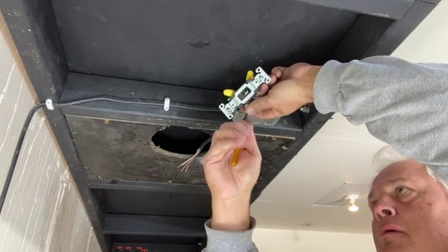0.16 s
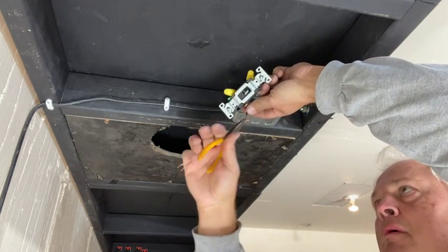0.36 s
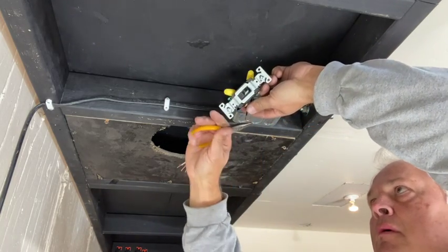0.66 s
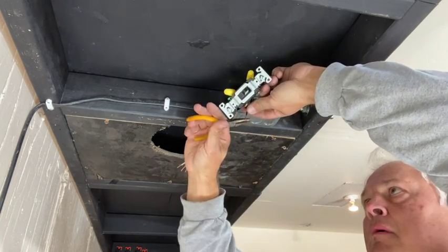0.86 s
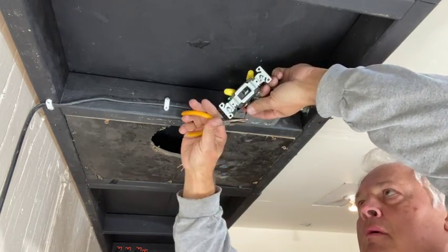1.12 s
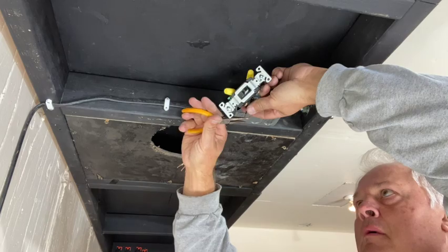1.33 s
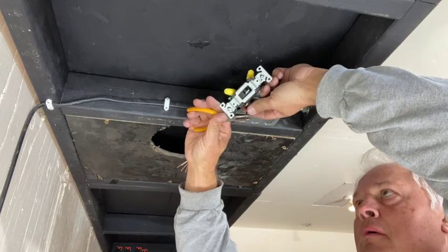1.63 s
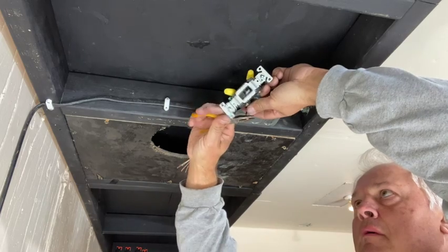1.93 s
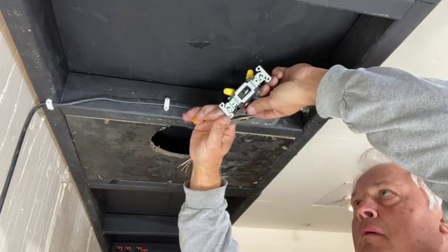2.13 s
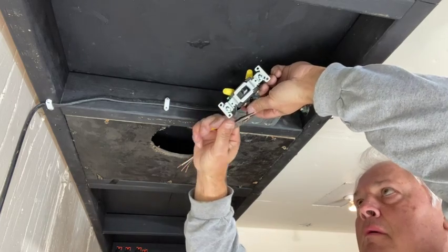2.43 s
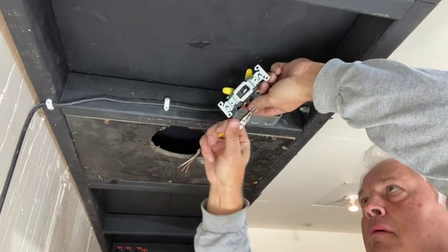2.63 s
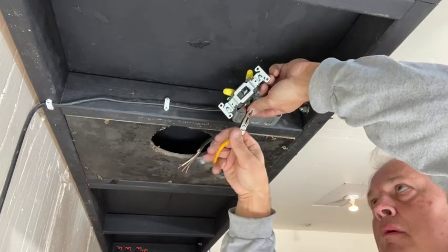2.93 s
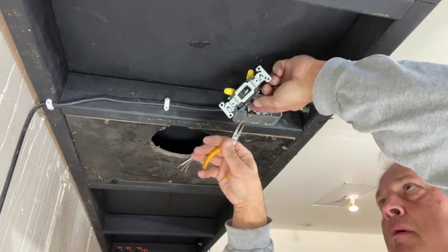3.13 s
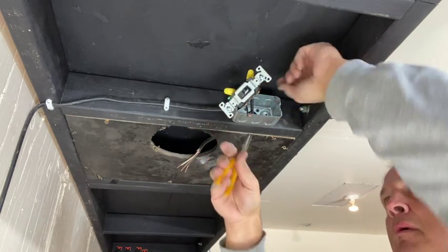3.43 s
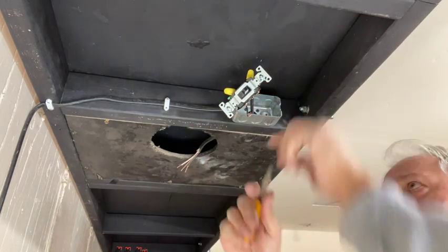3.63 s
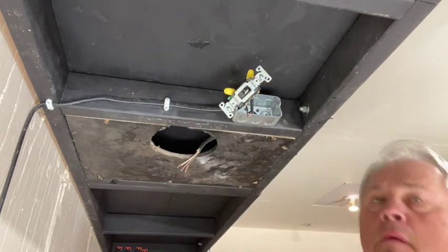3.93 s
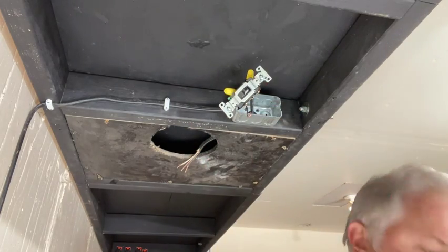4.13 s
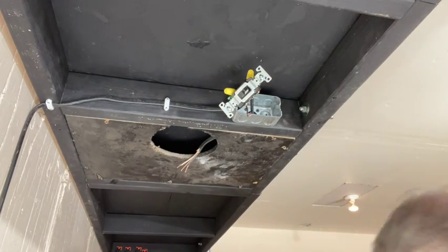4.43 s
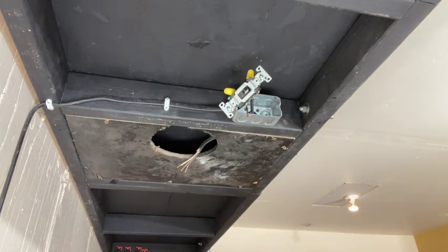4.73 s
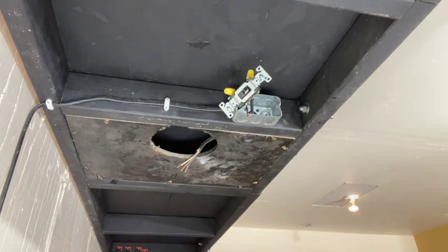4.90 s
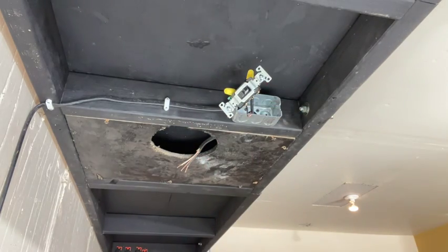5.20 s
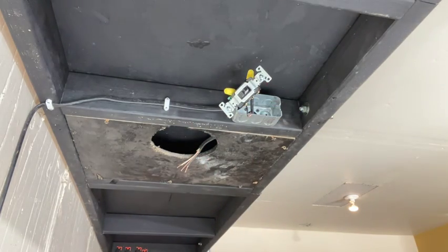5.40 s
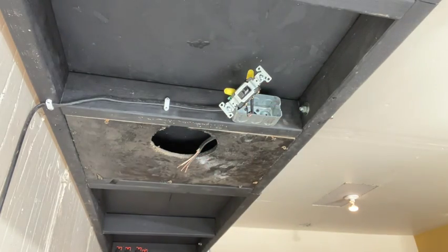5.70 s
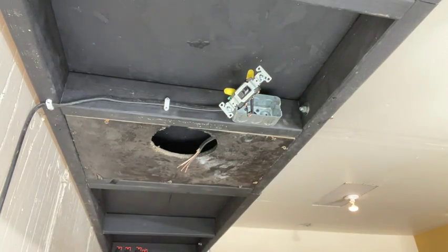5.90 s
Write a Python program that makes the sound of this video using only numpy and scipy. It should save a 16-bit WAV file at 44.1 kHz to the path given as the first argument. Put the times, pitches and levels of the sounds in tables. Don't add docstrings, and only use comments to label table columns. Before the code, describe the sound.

In a quiet bare room, irregular small steel snaps and wire scratches come with box knocks and low woody bumps, strongest around two and three seconds. Cloth rustles, soles scuff on rungs, tools clink lightly. Near five seconds a far louder burst of hollow bangs and metal clatter erupts, ending in soft knocks, rustling and faint room tone.

```python
import sys
import numpy as np
from scipy import signal
from scipy.fft import rfft, irfft, next_fast_len
from scipy.io import wavfile

SR = 44100
rng = np.random.default_rng(int(sys.argv[2]) if len(sys.argv) > 2 else 0)


def gain_from_db(level_db):
    decades = np.asarray(level_db, float) / 20
    return 10 ** decades


def unload_audio(sound):
    columns = np.transpose(np.atleast_2d(sound))
    steps = np.round(np.clip(columns, -1, 1) * 32767)
    wavfile.write(sys.argv[1], SR, steps.astype(np.int16))


N = 266893

# pitch_hz, level_db, t60_s
TOOL_MODES = [(1870, -54, 0.065), (2562, -5, 0.091), (3300, 9, 0.035), (3916, 16.5, 0.018),
              (4320, -5, 0.06), (4306, 20, 0.0086), (5170, 13, 0.02), (8370, 21, 0.0093), (8900, 6, 0.0069),
              (10850, 0, 0.015)]
# pitch_hz, level_db, t60_s
BOX_MODES = [(1112, 9.5, 0.12), (1227, 14, 0.15), (1365, 17, 0.026), (1510, 8.5, 0.11), (1926, -11.5, 0.1)]
# pitch_hz, level_db, t60_s
BASE_MODES = [(134.5, -4.5, 0.034), (192, -2, 0.037), (290, -6.5, 0.032), (344, -6, 0.091)]
# freq_hz, density_db_per_hz
CRACK_SPECTRUM = [(1760, -34), (3600, -5.5), (5220, -0.5), (7240, -11.5), (9760, -7.5), (11700, -21),
                  (12150, -23), (13400, -23), (13900, -23.5), (15800, -21.5), (16400, -55)]
NEAR_LAG, FAR_LAG = -4, 11


def terminals():
    return placed(ticks() + box_knocks() + rubbing(), NEAR_LAG, 0.075, wet_db=-7.5)


def ticks():
    # start_s, tool_ring_db, snap_above_ring_db
    contacts = [(0.14, -60, 0), (0.179, -58.5, -3), (0.248, -50, -27), (0.2612, -45, -26),
                (0.283, -46.5, 4), (0.304, -46, 6.5), (0.337, -40.5, -2), (0.352, -40.5, -5),
                (0.4864, -99, 32), (0.823, -51.5, -3.5), (0.93, -61, -25), (0.9922, -45.5, 0),
                (1.071, -58, 1), (1.343, -37, -7), (1.443, -67, -24), (1.592, -53, 6.5), (1.772, -50, -20),
                (1.906, -50.5, 6.5), (1.924, -47.5, 2.5), (1.9405, -37.5, -5), (1.999, -34, 4.5),
                (2.0188, -37.5, 2), (2.0575, -40, 6), (2.183, -78, -17), (2.414, -52.5, 0),
                (2.735, -68, 5.5), (2.813, -65, -22), (2.94, -35.5, 2.5), (3.0202, -29.5, 1.5),
                (3.0461, -50, -16)]
    # start_s, tool_ring_db, snap_above_ring_db
    jingles = [
        (3.834, -51.5, 1),
        (4.4945, -47.5, 0),
    ]
    # freq_hz, density_db_per_hz
    snap_spectrum = [(3240, -17), (5500, 6.5), (9920, 7.5), (11300, 1.5), (12300, 10), (13500, -11),
                     (15000, 4), (16000, -44), (16400, -66)]
    s, ring_db, snap_db = np.transpose(contacts + jingles)
    chatter_ms = np.full(len(s), 2.2)
    shank = varied(TOOL_MODES[:7], len(s), spread_db=0.0)

    def tool(force, k):
        rattle = band(band(force, 2830, 5040), 1700, 8800)
        return body(force, shank[k]) + 2.0 * rattle

    ring = hits(s, ring_db + 3.0, chatter_ms, tool, strike=0.84)
    snap = hits(s, ring_db + snap_db + 11.5, chatter_ms, lambda f, k: f, strike=4.8)
    return ring + coloured(snap, snap_spectrum)


def box_knocks():
    # start_s, level_db, spot_pitch_hz
    knocks = [(0.11, -63, 1520), (0.18, -57, 1330), (0.259, -49, 1360), (0.3033, -48, 1130),
              (0.3375, -67, 1115), (0.3517, -48.5, 1110), (0.823, -50.5, 1400), (0.927, -59, 1360),
              (0.994, -46, 1200), (1.0715, -50, 1100), (1.1855, -53.5, 1185), (1.3442, -35, 1330),
              (1.5944, -47.5, 1190), (1.7737, -59, 1340), (1.9418, -50, 1200), (2.0211, -64, 1630),
              (2.1808, -54, 900), (2.411, -54.5, 2000), (2.668, -63, 1050), (2.9415, -42, 970),
              (3.02, -28.5, 1340), (3.045, -35, 1170), (3.837, -53, 1070), (4.7745, -35.5, 1950),
              (2.984, -50, 2560)]
    s, level_db, spot_hz = np.transpose(knocks)

    def steel(force, k):
        spot = body(force, [(spot_hz[k], 0, 0.024)])
        return spot + 0.54 * body(force, BOX_MODES) + 0.11 * band(force, 940, 3100)

    return hits(s + 0.0014, level_db - 0.5, np.full(len(s), 5.0), steel, strike=1.4)


def rubbing():
    # freq_hz, density_db_per_hz
    scratch_spectrum = [(1060, -57), (1800, 9), (2530, 9.5), (3440, -41), (3950, -3.5), (6810, -17.5),
                        (10500, -7), (15400, -15), (16400, -40.5)]
    # start_s, end_s, pitch_hz, level_db,
    # t60_s
    drags = [(0.097, 0.135, 1490, -50, 0.03), (0.262, 0.29, 2520, -52, 0.03),
             (1.346, 1.42, 3800, -58, 0.01), (1.943, 1.965, 3700, -51, 0.02),
             (1.943, 1.965, 2700, -54, 0.02), (2.179, 2.21, 3650, -57, 0.02),
             (2.179, 2.205, 2650, -60, 0.02), (2.983, 3.068, 2530, -47, 0.035),
             (3.2, 3.25, 3250, -70, 0.03), (3.415, 3.47, 2050, -63, 0.008), (3.42, 3.5, 3500, -68, 0.01),
             (3.49, 3.58, 1620, -67, 0.02)]
    steeper = 2.1
    coarse, fine = grit(900, 4.5), grit(1400, 5.5)
    box = body(coarse, BOX_MODES) + 2.32 * band(coarse, 330, 3400)
    rub = gain_from_db(-3.5) * strokes(0.37, steeper) * box
    edge = coloured(fine + 4.6 * body(fine, TOOL_MODES), scratch_spectrum)
    scratch = gain_from_db(-13.5) * strokes(0.57, steeper) * edge
    t, squeal = np.arange(N) / SR, 0
    for start, end, hz, level_db, t60 in drags:
        grip = np.clip(np.minimum(t - start, end - t) / 0.0055, 0, 1)
        squeal = squeal + gain_from_db(level_db) * body(np.tanh(fine) * grip, [(hz, 0, t60)])
    return rub + scratch + squeal


def strokes(edge_share, steeper):
    # peak_s, panel_db, scratch_above_panel_db, rise_s, fall_s
    rubs = [(0.125, -56, -42, 0.082, 0.1), (0.268, -48.5, -7, 0.086, 0.28), (0.349, -41, -21.5, 0.23, 0.09),
            (0.834, -67, -19, 0.019, 0.062), (1.074, -51.5, -28.5, 0.37, 0.074),
            (1.2, -51, -70, 0.022, 0.083), (1.345, -49.5, -7.5, 0.027, 0.17), (1.6, -57, -47, 0.058, 0.33),
            (1.796, -48, -36, 0.31, 0.15), (1.7, -70, 0, 0.03, 0.039), (1.775, -70, -10, 0.035, 0.16),
            (1.825, -68, -16, 0.34, 0.036), (1.946, -39.5, -20, 0.011, 0.1), (1.914, -74.5, 26, 0.01, 0.3),
            (1.965, -62.5, 19.5, 0.12, 0.13), (2.04, -63, -22, 0.13, 0.31),
            (2.18, -52.5, -19.5, 0.015, 0.12), (2.412, -72, -2, 0.025, 0.32), (2.682, -62, -45, 0.76, 0.17),
            (2.951, -42.5, -8, 0.035, 0.095), (3.05, -47, 19, 0.2, 0.076)]
    swing_db, rounding = 30, 1.13
    s, level_db, edge_db, rise, fall = np.transpose(rubs)[:, :, None]
    coarse_steps = np.arange(0, N, 32)
    late = coarse_steps / SR - s
    away = np.maximum(-late / np.clip(rise, .005, 2), late / np.clip(fall, .005, 2))
    fade_db = swing_db * steeper * away ** rounding
    gain = gain_from_db(level_db + edge_share * edge_db - fade_db).max(axis=0)
    return np.interp(np.arange(N), coarse_steps, gain)


def panel():
    # start_s, drum_db, rib_db, push_ms
    tugs = [(0.121, -65, -47.5, 16), (0.157, -52, -73, 15), (0.181, -51, -47.5, 23),
            (0.268, -45.5, -35, 27), (0.297, -58, -34.5, 14), (0.332, -50, -69, 7.3),
            (0.827, -76, -54.5, 12), (0.934, -67, -55, 18), (1, -67.5, -52, 5.5), (1.099, -66.5, -55, 6.7),
            (1.191, -71, -74, 15), (1.315, -70, -55.5, 8.7), (1.373, -56.5, -80, 13),
            (1.417, -67, -53.5, 15), (1.942, -42.5, -30.5, 14.3), (2.031, -51, -58, 8.1),
            (2.141, -53.5, -56.5, 10), (2.666, -70, -60, 2.5), (2.959, -42.5, -37, 14),
            (3.028, -51.5, -38, 32.6)]
    # pitch_hz, level_db, t60_s
    skin_modes = [(132.3, 3.5, 0.23), (124, 2.5, 0.077), (87, -19.5, 0.7), (193, 2, 0.011),
                  (189.7, -8.5, 0.032)]
    # pitch_hz, level_db, t60_s
    rib_modes = [(228, 7, 0.075), (290.7, 2.5, 0.19), (361, 9, 0.031), (495, -7.5, 0.3), (553.8, 1, 0.13),
                 (700, 2.5, 0.014), (775.4, -8.5, 0.13), (890, -14.5, 0.12)]
    s, drum_db, rib_db, ms = np.transpose(tugs)
    skin = hits(s - .003, drum_db + 10.5, ms, lambda f, k: body(f, skin_modes), strike=52.0, rise_ms=3.9)
    ribs = hits(s, rib_db + 4.0, ms, lambda f, k: body(f, rib_modes), strike=4.3, rise_ms=10.3)
    rub = gain_from_db(-4) * strokes(0, 1) * body(grit(700, 2), rib_modes)
    return placed(band(skin + ribs + rub, 39, 1500), NEAR_LAG, 4.6, wet_db=-6)


def bows():
    # start_s, level_db, pitch_hz, push_ms
    pulls = [
        (0.121, -43.5, 242, 10),
        (0.265, -39, 171, 9.1),
        (1.943, -31, 184.7, 12),
        (2.956, -45, 178, 8),
        (0.124, -56, 527, 10),
        (0.14, -50, 249, 14),
        (0.185, -57, 540, 12),
        (1.962, -36, 184, 13),
    ]
    # start_s, level_db, pitch_hz,
    # chatter_ms
    pings = [(0.352, -42, 3970, 3), (1.3435, -52, 15000, 1), (1.999, -42, 4700, 3), (2.0203, -32, 4800, 2),
             (2.019, -31, 8000, 1.5), (2.059, -45, 3100, 3), (2.413, -58, 5000, .8), (2.94, -54, 15000, 1),
             (3.0205, -37, 14900, 1.5), (3.021, -36.5, 1330, 4.4), (4.776, -47, 2100, 6),
             (4.78, -41, 2830, 6.6)]
    s, level_db, pull_hz, ms = np.transpose(pulls)
    low = hits(s, level_db, ms, lambda f, k: around(f, pull_hz[k], 0.16), strike=13.0, rise_ms=2.3)
    s, level_db, ping_hz, ms = np.transpose(pings)
    tips = hits(s, level_db, ms, lambda f, k: around(f, ping_hz[k], .1), strike=3.8)
    return placed(low + tips, NEAR_LAG, 2.8, wet_db=-11.5)


def tray():
    # start_s, wall_blow_db, metal_above_blow_db, rattle_ms, struck_spot_hz
    drops = [(4.973, -12.5, -26, 24, 831), (4.983, -16.5, -8, 8, 453), (5.004, -6, -16, 5.6, 881),
             (5.012, -12.5, -10, 5.6, 438), (5.029, -21.5, -8.5, 60, 970), (5.051, -25, -8.5, 7.3, 450),
             (5.086, -12, -3, 6.4, 810), (5.095, -7.5, -21, 4.5, 665), (5.117, -12, -15.5, 11, 561),
             (5.131, -15, -12.5, 18, 666.6), (5.16, -24, -10.5, 45, 710), (5.247, -23, -16.5, 6.1, 810),
             (5.2525, -6.5, -22, 3.4, 758), (5.259, -3, -16.5, 1.8, 611), (5.276, -16, -14, 20, 794),
             (5.316, -18.5, -19, 8, 603), (5.352, -23.5, -20.5, 18, 760)]
    # pitch_hz, level_db, t60_s
    wall_modes = [(437, 3.5, 0.03), (450, -1, 0.08), (551, -6, 0.036), (660, -2, 0.016), (737, 1.5, 0.028),
                  (800, -1, 0.027), (879, -5, 0.03), (961, -2, 0.065), (983, -1, 0.026),
                  (1130, -4.5, 0.091), (1215, 3.5, .04)]
    # pitch_hz, level_db, t60_s
    clank_modes = [(1726, -3, 0.0063), (1942, 3, 0.06), (2400, 7.5, 0.015), (2470, -3.5, 0.031),
                   (2780, -15, 0.004), (3600, 3.5, 0.0064), (5050, -10, 0.012), (5750, -0.5, 0.012),
                   (6050, -3, 0.01)]
    landings = [0, 5.084, 5.244, 7]
    s, wall_db, metal_db, ms, spot_hz = np.transpose(drops)
    thump_db = wall_db - 9.5 - 31 * (s - s[0])
    clank_db = wall_db + metal_db
    walls = []
    for modes, spot in zip(varied(wall_modes, len(s), spread_db=5.5), spot_hz):
        walls.append([(hz, db - 32.5 * np.log2(hz / spot) ** 2, t60) for hz, db, t60 in modes])
    tools = []
    for modes in varied(clank_modes, len(s), spread_db=3.0):
        tools.append([(hz * (1 + 0.05 * np.tanh(db - plain[1])), db, t60)
                      for (hz, db, t60), plain in zip(modes, clank_modes)])

    def wall(force, k):
        return band(body(force, walls[k]), 340, 1300) + 2.5 * around(force, spot_hz[k], 0.38)

    def metal(force, k):
        return 0.35 * body(force, tools[k]) + band(force, 800, 3300)

    low = hits(s - .001, wall_db - 0.26, ms / 2, wall, strike=17.0, rise_ms=0.47)
    low += hits(s + 0.0032, thump_db, ms, lambda f, k: body(f, BASE_MODES), strike=4.1)
    low = band(band(low, 80, 7600), 88, 7600)
    clank = hits(s, clank_db + 6.0, ms, metal, rise_ms=1.0, strike=0.46)
    crack = hits(s, clank_db + 3, ms, lambda f, k: f, rise_ms=0.35, strike=0.76)
    bright = clank + coloured(crack, CRACK_SPECTRUM)
    out, t = 0, np.arange(N) / SR
    for start, end in zip(landings, landings[1:]):
        on = (t >= start) & (t < end)
        out = out + placed(low * on, FAR_LAG, 2.6, wet_db=-1.7)
        out = out + placed(bright * on, FAR_LAG, -7.0, wet_db=0.7)
    return out


def handle_rocks():
    # start_s, knock_db, thump_db, contact_ms, pitch_hz
    rocks = [
        (5.501, -44, -49, 4, 820),
        (5.511, -38.5, -38.5, 1.7, 967),
        (5.526, -33.5, -40.5, 2.0, 855),
        (5.538, -44, -42, 2, 860),
        (5.5535, -26.5, -32.5, 1.5, 876),
        (5.573, -31, -64, 8, 832),
        (5.591, -43, -48, 4.9, 801),
        (5.61, -40, -49.5, 4, 677),
        (5.759, -65, -58.5, 11, 800),
    ]
    s, knock_db, thump_db, ms, rim_hz = np.transpose(rocks)

    def base(force, k):
        return band(body(force, BASE_MODES[1:]), 106.6, 510)

    knock = hits(s, knock_db + 0.1, ms, lambda f, k: around(f, rim_hz[k], 0.2), strike=6.3, rise_ms=1.95)
    thump = hits(s, thump_db, ms, base, strike=1.33, rise_ms=2.5)
    return placed(knock + thump, FAR_LAG, 0.26, wet_db=-9)


def clashes():
    # start_s, level_db, pitch_hz, rattle_ms
    clicks = [(4.985, -27, 6130, 5.7), (5.005, -22.5, 2030, 5), (5.016, -18, 1850, 7.2),
              (5.03, -27, 2526, 6.7), (5.085, -17.5, 2430, 6.4), (5.086, -14.5, 1920, 6),
              (5.086, -22.5, 5436, 5.6), (5.112, -23, 5170, 13), (5.148, -25.5, 2330, 12),
              (5.186, -32.5, 2324, 13), (5.256, -27.5, 2850, 3.9), (5.257, -29.5, 6240, 2.3),
              (4.977, -19.5, 798, 10), (5.003, -10.5, 872, 1.5), (5.014, -22, 1513, 8.5),
              (5.0874, -34.5, 14800, 2), (5.259, -20.5, 282, 6.8), (5.41, -40, 559, 33)]
    # start_s, level_db, length_ms
    tray_jolt = (5.256, -27.5, 2.5)
    s, level_db, hz, ms = np.transpose(clicks)
    steel = hits(s, level_db, ms, lambda f, k: around(f, hz[k], .14), strike=3.0)
    jolt = hits(*np.transpose([tray_jolt]), lambda f, k: band(f, 25, 210), strike=20.5)
    return placed(steel + jolt, FAR_LAG, -1.5, wet_db=-2.0)


def shoes():
    # start_s, grit_db, hiss_above_grit_db, sole_db, rise_ms
    scuffs = [(3.6884, -39.5, -39, -61.5, 1.4), (3.7217, -44.5, -35, -67, 1.4), (4.0839, -72, 14, -51, 1.4),
              (4.17, -45, -3.5, -66, 30), (4.198, -53, -9, -49, 12), (4.313, -41, -4.5, -50, 14),
              (4.6, -59, 6, -94, 8), (4.67, -61.5, -4, -57.5, 4), (4.7747, -43, -8, -55, 1.4),
              (4.8481, -46, -2.5, -55.5, 8), (5.903, -59.5, 9, -79, 8), (5.98, -59.5, 2, -70.5, 8)]
    # start_s, level_db
    treads = [
        (3.717, -72),
        (4.321, -57),
        (4.8522, -75),
    ]
    s, grit_db, hiss_db, sole_db, rise = np.transpose(scuffs)
    slide_ms, sole_ms = np.full(len(s), 27.0), np.full(len(s), 7.9)

    def sole(force, k):
        return band(force, 290, 880) + 0.19 * body(force, [(505.0, 0, 0.049)])

    dull = hits(s, sole_db + 11.0, sole_ms, sole)
    bright = hits(s, grit_db + 5.0, slide_ms, lambda f, k: band(f, 1100, 3700), strike=0.05, rise_ms=rise)
    hiss = hits(s, grit_db + hiss_db + 3.5, slide_ms, lambda f, k: f, strike=0.05, rise_ms=rise)
    s, tread_db = np.transpose(treads)
    rung = hits(s, tread_db + 3.0, slide_ms, lambda f, k: band(f, 62, 200))
    return placed(dull + rung + bright + coloured(hiss, CRACK_SPECTRUM), 40, -1.8, wet_db=1.0)


def shuffle():
    # time_s, effort_db
    sleeves = [
        (3.1, -63),
        (3.196, -66),
        (3.32, -72),
        (3.4, -68),
        (3.47, -65.5),
        (3.56, -70.5),
        (3.68, -113),
    ]
    # time_s, effort_db
    stepping = [
        (3.58, -89),
        (3.68, -68),
        (3.72, -68.5),
        (3.846, -59.5),
        (4.072, -71),
        (4.24, -70),
        (4.42, -75.5),
        (4.654, -64),
        (4.99, -55.5),
    ]
    # time_s, level_db
    tray_fade = [
        (5.381, -53.5),
        (5.46, -58),
        (5.56, -58.5),
        (5.62, -66),
        (5.7, -87),
        (5.869, -68),
        (5.93, -71.5),
        (6.05, -71),
    ]
    # freq_hz, density_db_per_hz
    cloth_spectrum = [(410, -49), (700, -25), (1200, -4.5), (1600, 2), (2400, -0.5), (3600, -10.5),
                      (5000, -14.5), (7000, -30), (9900, -80.5)]
    # freq_hz, density_db_per_hz
    creak_spectrum = [(82, -64), (140, -28), (172, 0), (205, -8), (296, -8), (524, -9.5), (1100, -14),
                      (1430, -39), (2420, -120)]
    # centre_s, half_length_s, top_hz, level_db
    sole_squeak = (4.63, .05, 11200, -80)
    arms, feet, fading = [gain_from_db(in_time(rows)[0]) for rows in (sleeves, stepping, tray_fade)]
    rustle = diffuse(N) + 0.016 * grit(970, spread_db=24.0)
    creak = flutter(25, 1.5) * coloured(rustle, creak_spectrum)
    cloth = flutter(22, 2.5) * coloured(rustle, cloth_spectrum)
    hiss = flutter(30, 1) * coloured(rustle, CRACK_SPECTRUM)
    moving = arms * (cloth + gain_from_db(-2.5) * creak)
    moving += feet * (cloth + gain_from_db(-1.0) * creak + gain_from_db(-4.0) * hiss)
    moving += fading * (cloth + gain_from_db(2.0) * creak + gain_from_db(-12.0) * hiss)
    s, half, top_hz, level_db = sole_squeak
    late = np.arange(N) / SR - s
    pitch_hz = top_hz - 1.2e5 * late ** 2 + 60 * rustle[0]
    phase = 2 * np.pi * np.cumsum(pitch_hz) / SR
    squeak = np.exp(-(late / half) ** 2) * (np.sin(phase) + np.sin(0.925 * phase))
    return moving + gain_from_db(level_db) * squeak


def air():
    # freq_hz, density_db_per_hz
    air_spectrum = [(12, -56.5), (20, -31), (65, 1.5), (158, -7.5), (228, -16.5), (301, -11.5),
                    (422, -19.5), (1190, -22.5), (1760, -27.5), (2140, -27.5), (7110, -41), (9670, -39.5),
                    (11100, -46), (12100, -48), (16000, -64)]
    # pitch_hz, level_db, t60_s
    whines = [(178, -74, .15), (1190, -86, .06), (2140, -92, .06)]
    noise = diffuse(N)
    tones = 0
    for hz, level_db, t60 in whines:
        tones = tones + gain_from_db(level_db) * rms_one(body(noise, [(hz, 0, t60)]))
    return gain_from_db(-68) * coloured(noise, air_spectrum) + tones


def hits(times, peak_db, ms, voice, strike=1.9, rise_ms=0.51):
    size = 16384
    out, t = np.zeros(N + size), 1000 * np.arange(size) / SR
    rise_ms = np.clip(rise_ms * np.ones(len(times)), .1, 60)
    for k, draw in enumerate(rng.standard_normal((len(times), 2, size))):
        swell = 1 - np.exp(-t / rise_ms[k])
        force = draw[0] * draw[1] * np.exp(-t / np.clip(ms[k], .3, 90)) * swell
        force[:8] += strike * np.hanning(8)
        sound = voice(force, k)
        out[round(times[k] * SR):][:size] += gain_from_db(peak_db[k]) * sound / np.abs(sound).max()
    return out[:N]


def body(force, modes):
    out, power = 0, 0
    for k, (hz, level_db, t60) in enumerate(modes):
        r, w = gain_from_db(-60 / (t60 * SR)), 2 * np.pi * hz / SR
        ring = signal.lfilter([0, np.sin(w)], [1, -2 * r * np.cos(w), r * r], force + 1e-18)
        out = out + (-1) ** k * gain_from_db(level_db) * ring
        power += gain_from_db(level_db) ** 2 / (4 * (1 - r))
    return out / np.sqrt(power)


def varied(modes, count, spread_db):
    shifts = spread_db * rng.standard_normal((count, len(modes)))
    return [[(hz, level_db + d, t60) for (hz, level_db, t60), d in zip(modes, row)] for row in shifts]


def grit(per_s, spread_db):
    sizes = gain_from_db(spread_db * np.minimum(rng.exponential(1, N), 4)) * rng.choice([-1, 1], N)
    return rms_one(sizes * (rng.random(N) < per_s / SR))


def flutter(rate, depth_db):
    steps = rng.standard_normal(int(rate * N / SR) + 2)
    return gain_from_db(depth_db * np.interp(np.arange(N) * rate / SR, np.arange(len(steps)), steps))


def in_time(rows):
    s, *columns = np.transpose(rows)
    return [np.interp(np.arange(N) / SR, s, c, -150, -150) for c in columns]


def around(x, hz, octaves):
    low_hz, high_hz = hz / 2 ** octaves, hz * 2 ** octaves
    return band(band(x, low_hz, high_hz), low_hz, high_hz)


def band(x, low_hz, high_hz):
    return signal.sosfilt(signal.butter(2, [low_hz, high_hz], "band", fs=SR, output="sos"), x)


def rms_one(x):
    return x / np.sqrt(np.mean(x ** 2) + 1e-20)


def at_hz(points, hz):
    return np.interp(np.log(hz + 1), np.log(np.array(points)[:, 0]), np.array(points)[:, 1])


def shaped(x, gain):
    size = next_fast_len(N, True)
    return irfft(rfft(x, size) * gain(np.fft.rfftfreq(size, 1 / SR)), size)[..., :N]


def coloured(x, spectrum):
    return shaped(x, lambda hz: rms_one(gain_from_db(at_hz(spectrum, hz))))


def placed(x, lag, pan_db, wet_db):
    direct = np.array([np.roll(x, lag) * gain_from_db(pan_db / 2), x * gain_from_db(-pan_db / 2)])
    return direct + gain_from_db(wet_db) * room(x)


def room(x):
    # freq_hz, t60_s
    room_t60 = [(100, 0.33), (400, 0.27), (1500, 0.26), (5000, 0.2), (12000, 0.17)]
    size = 32768
    t, noise = np.arange(size) / SR, diffuse(size)
    tail = 0
    for hz in 45 * 2. ** np.arange(9):
        octave = band(noise, hz / 2 ** .5, hz * 2 ** .5)
        tail = tail + octave * gain_from_db(-60 * t / at_hz(room_t60, hz))
    tail = tail * (1 - np.exp(-t / .005))
    return signal.fftconvolve(x[None], tail / np.sqrt(np.sum(tail ** 2) / 2))[:, :N]


def diffuse(length):
    # freq_hz, left_right_likeness
    likeness = [(60, 1), (200, 0.28), (500, -0.075), (2000, 0.13), (5000, -0.024), (9000, 0.91)]
    size = next_fast_len(length, True)
    alike = np.clip(at_hz(likeness, np.fft.rfftfreq(size, 1 / SR)), -1, 1)
    mid, side = rfft(rng.standard_normal((2, length)), size)
    both = np.sqrt(.5 + alike / 2) * mid + np.sqrt(.5 - alike / 2) * side * [[1], [-1]]
    return irfft(both, size)[:, :length]


def scene():
    work = terminals() + panel() + bows()
    tools_away = tray() + handle_rocks() + clashes()
    return work + tools_away + shoes() + shuffle() + air()


def roll_off(x):
    return signal.sosfilt(signal.butter(12, 16300, fs=SR, output="sos"), x)


def record(dry):
    # freq_hz, gain_db
    mid_gain = [(11500, -0.5), (12000, -26.5), (13300, -26.5), (13800, -4), (16000, 1), (16300, -43)]
    # freq_hz, gain_db
    side_gain = [(8200, 0), (8600, -35), (10500, -28.5), (11000, 9.5), (13900, 7.5), (14600, -21.5),
                 (15800, -32), (16200, -54.5)]
    left, right = 1.245 * np.tanh(dry / 1.328)
    mid = shaped((left + right) / 2, lambda hz: gain_from_db(at_hz(mid_gain, hz)))
    side = shaped((left - right) / 2, lambda hz: gain_from_db(at_hz(side_gain, hz)))
    return roll_off(np.array([mid + side, mid - side]))


dry = scene()
out = record(dry)
unload_audio(out)
```